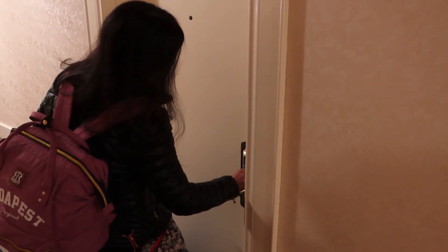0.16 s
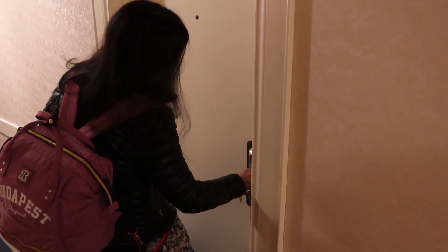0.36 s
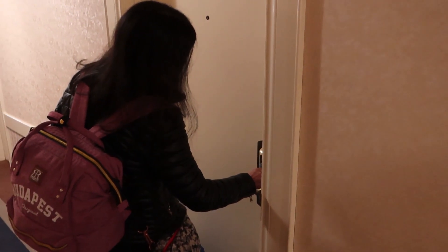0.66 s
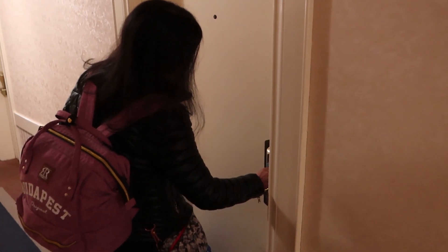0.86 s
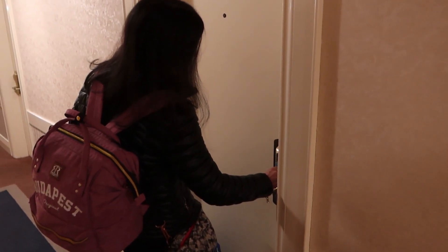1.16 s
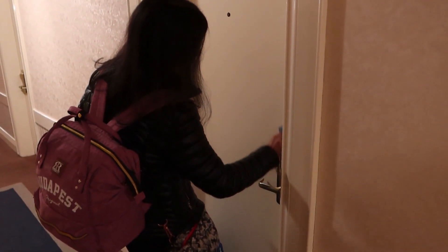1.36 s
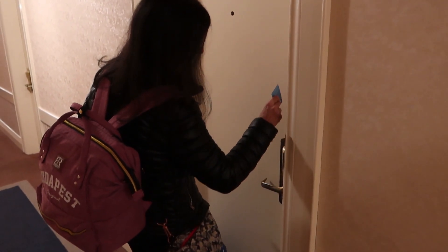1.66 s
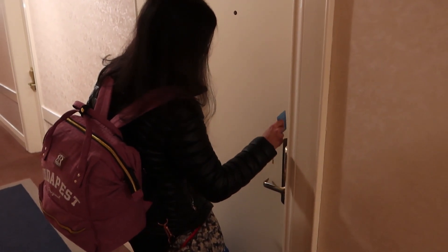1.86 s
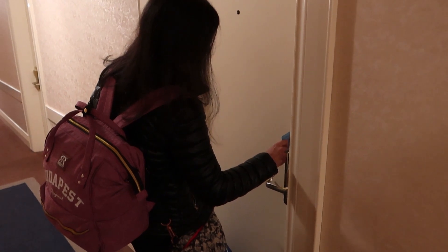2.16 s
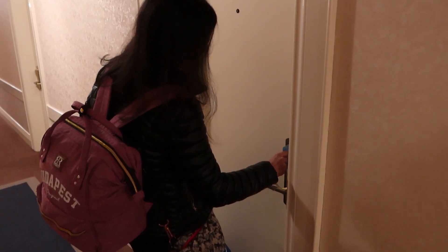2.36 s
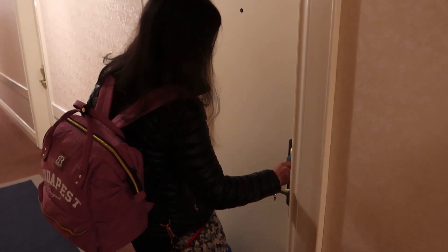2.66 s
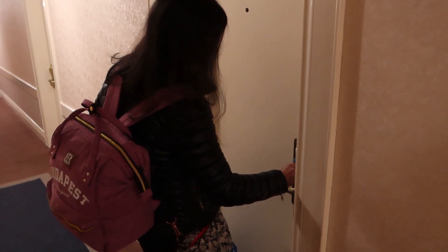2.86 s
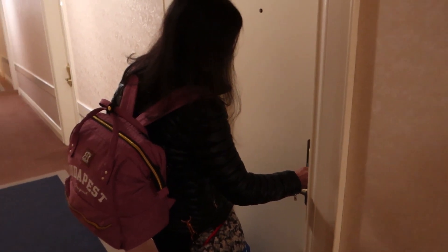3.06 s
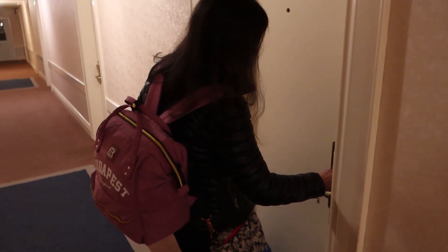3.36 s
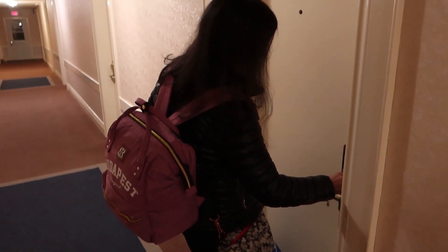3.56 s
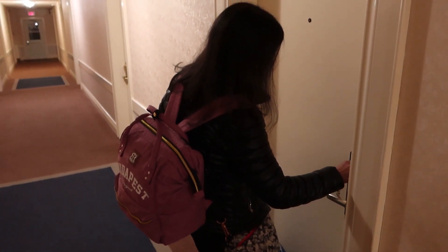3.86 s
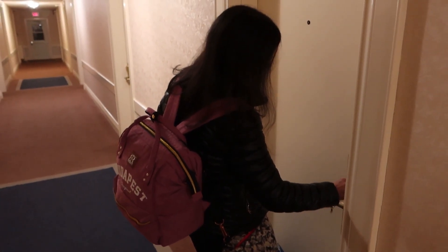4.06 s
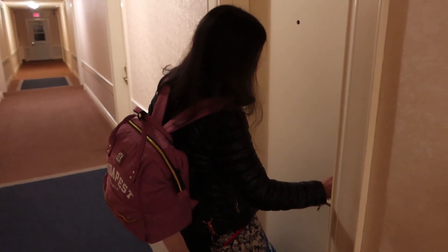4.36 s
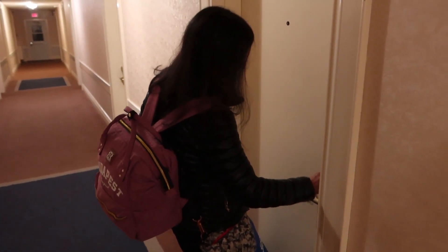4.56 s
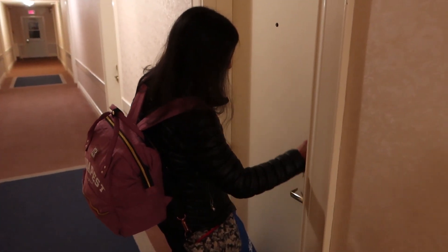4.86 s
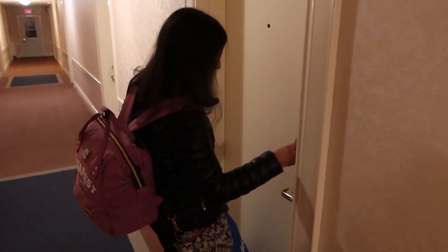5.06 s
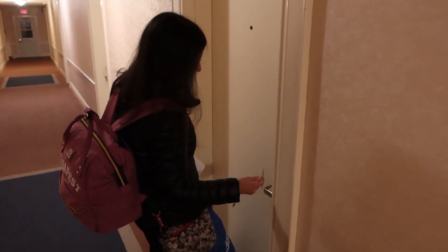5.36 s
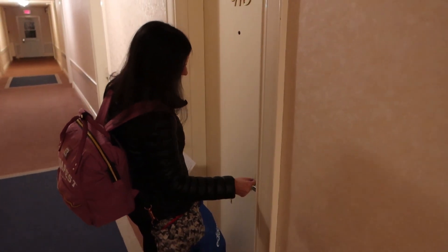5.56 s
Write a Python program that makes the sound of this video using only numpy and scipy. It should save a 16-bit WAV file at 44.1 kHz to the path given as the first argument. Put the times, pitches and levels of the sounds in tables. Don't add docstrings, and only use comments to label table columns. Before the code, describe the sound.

A metal door lever and lock are worked over and over in a carpeted corridor, with hard clunks, bright clicks and loose rattling.

```python
import sys
import numpy as np
from scipy import signal
from scipy.fft import rfft, irfft
from scipy.io import wavfile
from scipy.ndimage import uniform_filter1d

SR = 44100
rng = np.random.default_rng(int(sys.argv[2]) if len(sys.argv) > 2 else 0)


def dump_mix(stems):
    frames = np.atleast_2d(stems).T
    limited = np.clip(frames, -1, 1)
    pcm = np.round(limited * 32767).astype(np.int16)
    wavfile.write(sys.argv[1], SR, pcm)


def voltage_ratio(decibels):
    exponent = np.asarray(decibels, float) / 20
    return 10 ** exponent


N = 251634

# frequency in Hz, level in dB, time to fall 60 dB in seconds.
LEVER_LOW = [(2450, 1.5, 0.015), (2920, -2.5, 0.0086), (3100, 10, 0.014), (3363, 3.5, 0.03),
             (3970, 10, 0.021), (4440, 3, 0.023), (4970, -3.5, 0.091)]
LEVER_HIGH = [(5560, -8.5, 0.068), (5830, 0, 0.028), (6350, 5, 0.026), (6880, -5, 0.11),
              (7450, -0.5, 0.083), (7970, -16, 0.098), (8000, 1, 0.035), (8200, 3, 0.02),
              (8700, -17.5, 0.015), (9880, -34, 0.011), (12070, -41, 0.015), (13200, -35, .03)]
CASE = [(790, -6, 0.22), (800, -37, 0.02), (947, -3.5, 0.17), (1040, -2, 0.2), (1150, 0, 0.043),
        (1360, -16.5, 0.13), (1360, 12, 0.043), (1440, -13, 0.16), (1530, 9, 0.03), (1700, 6.5, 0.026),
        (2003, -4, 0.013), (2200, 1, 0.029)]
LEAF = [(150, -12, 0.1), (197.6, 5, 0.054), (304, -2, 0.15), (383.7, -3, 0.13), (462, -4.5, 0.093),
        (603.7, -0.5, 0.2), (693, -11, 0.024)]
# frequency in Hz, density in dB
# per Hz.
HISS = [(40, -26), (144, 9.5), (400, -36), (529, 3), (680, -7), (990, -4), (3300, -11), (16000, -15)]
# frequency in Hz, rms level in dB.
WHINE = [(1001, -68), (2998, -69.5), (4000, -63), (5001, -68.5), (6998, -72), (8000, -67.5), (9001, -72),
         (11999, -75)]
# time in seconds, gain in dB.
WHINE_SWELL = [(0, -7), (1.3, -3.5), (2.5, -4), (3.68, -5.5), (3.74, -3), (4.8, -14), (5.71, -5)]
# frequency in Hz, time to fall 60 dB in seconds.
CORRIDOR_DECAY = [(60, 0.81), (160, 1), (420, 0.69), (1100, 0.72), (1750, 0.7), (2900, 0.58), (7700, 0.52),
                  (14000, 0.25)]
# start in seconds, peak in dB, frequency in Hz, time to fall 60 dB in seconds.
THUMPS = [(1.064, -43.5, 204, 0.2), (1.498, -13, 265, 0.04), (1.512, -29.5, 74.3, 0.59),
          (4.842, -19, 270, 0.022), (4.854, -30, 332, 0.045), (4.946, -24.5, 343, 0.046),
          (4.964, -20, 285, 0.031), (4.978, -27, 92, 0.041), (5.27, -36, 520, 0.032),
          (0.1058, -26, 1300, .02), (0.1062, -29, 3100, .012), (0.2075, -38, 1000, .015),
          (0.3745, -38, 1100, .02), (1.4815, -9, 1410, .014), (2.971, -28, 5950, .045),
          (4.1075, -18, 1300, .03), (4.4245, -16, 1200, .03), (4.472, -26, 5900, .06),
          (4.6545, -27, 1040, .025), (2.584, -38, 1400, .08), (2.936, -36, 3500, .015),
          (3.706, -36, 650, .03), (4.7235, -15, 1330, .03), (4.726, -20, 1750, .015),
          (4.882, -28, 1120, .02), (4.968, -30, 1550, .06)]
# start in seconds, peak in dB, loudest ring in Hz,
# share below 5 kHz in dB, share of the loudest ring in dB.
FUMBLE_TICKS = [
    (0.073, -42, 2650, 0, 3),
    (0.087, -34, 2690, -7, 2),
    (0.106, -33.5, 2760, 4, 13.5),
    (0.211, -47, 2730, -3, 3),
    (0.233, -40.5, 8140, -1, -10),
]
BRUSH_TICKS = [
    (0.385, -39, 4440, -18, -5),
    (0.402, -36, 7900, -16, -9),
    (0.462, -41.5, 7840, -5, -8),
    (0.952, -28.5, 5000, -9.5, -3.5),
]
SNAP_TICKS = [
    (1.366, -36, 3300, 1, -8),
    (1.427, -31, 2910, 5, 0),
    (1.4515, -7.5, 7800, -8.5, -11),
    (1.4772, -14.5, 3100, 10.5, -25),
    (1.5434, -22.5, 4700, -23, -13),
    (1.632, -27.5, 7840, -16, -13),
    (1.747, -40, 3630, -10, -14),
    (1.785, -42.5, 3800, -2.5, -5),
    (2.0225, -37, 6350, 1, -3),
]
CARD_TICKS = [
    (2.584, -50, 2300, 4.5, 15),
    (2.7, -49.5, 2970, 6, -7),
    (2.88, -49, 3010, 1, -2),
    (2.913, -34.5, 2730, 2.5, -18),
    (2.934, -38, 3500, 4, 0),
    (2.9662, -28.5, 6000, -2, -2),
    (2.996, -41, 2620, 8, 14),
    (3.172, -25, 2780, -10, -7),
    (3.178, -24, 8800, 1, -4),
    (3.7055, -39.5, 3250, -2, 1),
]
PUMP_TICKS = [(4.014, -48, 3100, 10.5, 19.5), (4.1028, -15, 3960, -7, -14), (4.1072, -15, 8250, -4.5, -8),
              (4.152, -29, 3000, 7.5, -11), (4.165, -20.5, 3280, -14, -2.5), (4.356, -35, 3570, 1.5, 3),
              (4.4176, -13.5, 3150, -16, -2), (4.4223, -10, 3130, -6, -18), (4.4638, -20, 5600, -4, 3),
              (4.485, -25, 5960, -10, 0), (4.599, -34, 4900, -13, -4), (4.718, -18.5, 2700, -6, -5),
              (4.721, -22, 8000, 4, -2)]
RELEASE_TICKS = [(4.877, -37, 3380, 9.5, 2.5), (4.889, -28, 3660, -2.5, -7), (4.911, -9.5, 7730, -10, -5),
                 (4.937, -24, 5370, -3, -10), (5.004, -25.5, 3600, -10, -11), (5.044, -33.5, 3350, 5, 3),
                 (5.14, -41.3, 6540, -11, 0), (5.234, -43, 3700, 4.5, -8), (5.267, -42, 5840, -2, -3),
                 (5.449, -44.5, 3300, 2, -7), (5.615, -35, 7100, 1, -3)]
# start in seconds, peak in dB, loudest ring in Hz,
# share of the door leaf in dB, share of the loudest ring in dB.
FUMBLE_KNOCKS = [(0.074, -29, 1090, -25, -12), (0.09, -30, 1310, -25, 6.5), (0.106, -25, 1040, -20, -8),
                 (0.119, -30, 950, -7, 1), (0.161, -38, 1070, 4, 4), (0.2075, -33, 1440, -6, -12),
                 (0.223, -44, 1000, -12, 2), (0.305, -42, 1280, -10, -13), (0.37, -39.5, 1340, -4, -8),
                 (0.449, -51, 1440, 0, -1), (0.474, -42, 1290, -11, 4), (0.69, -59, 1090, 1.9, -4)]
SNAP_KNOCKS = [
    (1.3634, -38, 1440, -15.5, 7),
    (1.427, -20, 1410, -10.5, -10),
    (1.452, -16, 1320, -27, 7.5),
    (1.4593, -5, 1040, -19.5, -6),
    (1.4808, -4.5, 1380, -3, 4.5),
    (1.4855, -14, 1100, 5.5, -3),
    (1.591, -16, 1380, -17, -23),
    (2.024, -43, 1700, -9, 5),
]
CARD_KNOCKS = [(2.582, -29, 1450, -2, -13), (2.698, -36, 950, -12, -10), (2.879, -54, 1870, 7, -7),
               (2.912, -29, 1360, 0, -10), (2.934, -36, 950, 7, 10), (2.965, -20, 720, 1, 1),
               (2.9975, -18, 1380, -9, -16), (3.093, -31.5, 1150, -2, -1), (3.175, -28, 1790, 7, -5),
               (3.1822, -18, 1530, -15, -5), (3.296, -34, 1053, -13, -27), (3.7055, -28, 800, -9, -3)]
PUMP_KNOCKS = [(4.0156, -30, 1440, 1.5, -1), (4.038, -30, 1500, -2, -11), (4.1033, -26, 1290, -22, -9),
               (4.1065, -6.5, 1250, -17, -13), (4.151, -19, 1420, -17, -5.5), (4.17, -29, 1150, -20, -10),
               (4.268, -30.5, 1240, -5, -1), (4.359, -22.5, 1550, -3, -37), (4.42, -18, 1580, -21, 4),
               (4.423, -13, 1170, -20, 5), (4.462, -25, 960, -1, 7), (4.532, -20.5, 810, -7, -3),
               (4.636, -39, 1120, -10, 6), (4.654, -34, 1170, -5, 3), (4.718, -24, 1150, -22, -5.5),
               (4.7225, -9, 1150, -11.5, -13), (4.748, -30.5, 1170, 8.5, -11)]
RELEASE_KNOCKS = [
    (4.844, -26, 1340, -13, -13),
    (4.875, -25, 1130, -19, 0),
    (4.909, -17, 1420, -3, 3),
    (4.94, -26, 1130, 7, 5),
    (4.966, -27, 1530, -11, 1),
    (5.048, -32, 1280, -5, 2),
    (5.26, -56, 1170, -3, -4),
    (5.448, -46, 1440, 2, 2),
    (5.618, -34, 790, -10, 4.5),
]
# start in seconds, hold in seconds, level in dB, brightness in dB.
RUBS = [(0.0, 0.25, -49, -10.5), (1.375, .05, -54, -1), (1.437, 0.19, -35, -11.5),
        (1.943, 0.31, -51.5, -18), (2.779, 0.31, -58, -11), (3.173, 0.018, -43, -23),
        (3.742, 0.058, -53.5, 1), (3.858, 0.13, -50, -26), (4.054, 0.044, -51, 3.5), (4.17, 0.021, -38, -9),
        (4.418, 0.24, -42, -6.5), (4.813, 0.24, -47, -2), (5.19, 0.57, -53.5, -6), (5.5, 0.29, -51, -11)]
# time in seconds, level in dB.
SWAY = [(0, -42), (.14, -53), (.62, -51), (1.41, -48), (1.52, -40), (1.84, -52), (2.33, -42),
        (2.561, -48.5), (2.64, -34), (2.74, -43), (3.11, -43.5), (3.73, -46), (3.81, -38), (4.27, -37),
        (4.72, -49), (4.97, -38.5), (5.3, -44.5), (5.71, -39)]
# start in seconds, hold in seconds, thud in dB, boom in dB.
JOLTS = [(0, 0.0089, -61, -72), (1.127, 0.024, -52, -55), (1.53, 0.06, -31.5, -41), (1.786, 0.31, -61, -55),
         (2.19, 0.023, -44, -61), (2.634, 0.017, -48, -65), (3.1, 0.087, -57.5, -52),
         (4.07, 0.11, -47.5, -49.5), (4.854, 0.029, -39.5, -46), (4.953, 0.0085, -39, -42),
         (5.088, 0.016, -41.5, -66), (5.67, .05, -42.5, -61)]
# start in seconds, peak in dB, centre in Hz, chatter in seconds.
RATTLES = [(0.105, -29, 3200, .006), (0.2065, -40, 700, .008), (0.375, -42, 1100, .006),
           (1.3708, -46, 8470, .012), (1.4965, -15, 900, .008), (1.511, -20, 1100, .01),
           (1.526, -27, 800, .01), (1.553, -27, 1300, .01), (1.603, -25.5, 1000, 0.009),
           (1.639, -30, 1200, .01), (1.706, -31, 1560, .01), (1.78, -33, 900, .01), (2.968, -34, 605, .012),
           (4.0617, -47, 8160, .008), (4.099, -34, 1200, .004), (4.106, -12, 2200, .008),
           (4.111, -17, 8480, .006), (4.209, -42, 13200, .006), (4.252, -30, 1200, .008),
           (4.318, -34, 1180, .008), (4.334, -45, 8600, .006), (4.415, -25, 1010, .004),
           (4.422, -24, 2300, .008), (4.471, -20, 900, 0.0067), (4.471, -27, 5900, .008),
           (4.544, -31, 1500, 0.0074), (4.597, -34, 1500, .01), (4.6084, -40, 5200, 0.007),
           (4.6545, -31, 1040, 0.0037), (4.673, -45, 8010, .008), (4.712, -35, 900, .005),
           (4.7225, -17, 1890, .008), (4.8, -36, 904, .008), (4.851, -29, 1500, .008),
           (4.914, -22, 2300, .008), (4.97, -29, 2800, .01), (4.995, -31, 1100, .008)]
# start in seconds, hold in seconds, level in dB.
SPRING = [
    (1.375, .06, -58),
    (1.49, .05, -57),
    (4.03, .05, -64),
    (4.123, .02, -51),
    (4.19, .035, -56),
    (4.438, .06, -53),
    (4.73, .02, -58),
    (4.93, .1, -54),
]
# start in seconds, hold in seconds, level in dB, frequency in Hz.
DUCTS = [
    (.6, .7, -65, 860),
    (1.9, .45, -64, 1750),
    (5.5, .2, -60, 1650),
]

GRIP_LEVER, GRIP_CASE = 0.11, 0.3
RUB_RISE_DB_PER_S = 292


def curve(rows):
    s, db = np.transpose(rows)
    return np.interp(np.arange(N) / SR, s, db)


def at_hz(points, hz):
    table_hz, value = np.transpose(points)
    return np.interp(np.log(hz), np.log(table_hz), value)


def rms_one(x):
    return x / np.sqrt(np.mean(x ** 2) + 1e-20)


def energy_one(x):
    return x / np.sqrt(np.sum(x ** 2))


def band(x, low_hz, high_hz):
    return signal.sosfilt(signal.butter(2, [low_hz, high_hz], "band", fs=SR, output="sos"), x)


def shaped(x, spectrum):
    hz = np.maximum(np.fft.rfftfreq(len(x), 1 / SR), 1)
    return irfft(rfft(x) * voltage_ratio(at_hz(spectrum, hz)), len(x))


def swells(starts, holds, levels_db, rise_db_per_s, fall_db_per_s):
    t = np.arange(0, N + 64, 64)[:, None] / SR
    before = np.maximum(starts - t, 0)
    after = np.maximum(t - starts - holds, 0)
    db = levels_db - rise_db_per_s * before - fall_db_per_s * after
    return np.interp(np.arange(N) / SR, t[:, 0], np.sqrt(np.sum(voltage_ratio(db) ** 2, axis=1)))


def add(out, sound, s):
    i = round(s * SR)
    out[i:i + len(sound)] += sound[:N - i]


def ring(modes, spread_db, detune, grip=1, size=4500):
    hz, level_db, t60 = np.transpose(modes)[:, :, None]
    pitch_chance, level_chance = rng.standard_normal((2, 16, 1))[:, :len(modes)]
    t = np.arange(size) / SR
    waves = np.sin(2 * np.pi * hz * (1 + detune * pitch_chance) * t)
    decay = voltage_ratio(level_db + spread_db * level_chance - 60 * t / t60 / grip)
    return energy_one((decay * waves).sum(axis=0))


def chatter(length_s, per_s, size=3000):
    part = np.arange(size) / SR / np.clip(length_s, 0.002, 0.045)
    clicks = (rng.random(size) < per_s / SR) * rng.uniform(-1.21, 1, size)
    clicks[0] = 1.3
    softness = np.clip(60 * (length_s - 0.02), 0, 0.85)
    return energy_one(clicks * np.exp(-part ** 1.35) * (1 - softness * np.exp(-part / 0.2)))


def contacts(actions):
    rows = np.array([(*row, length_s) for table, length_s in actions for row in table])
    longest = 1.51 * np.diff(rows[:, 0])
    rows[:-1, -1] = np.minimum(rows[:-1, -1], longest)
    return rows


def ducts():
    out, air = np.zeros(N), rng.standard_normal(N)
    width, swell_db_per_s = 1.04, 60
    for s, hold, db, hz in DUCTS:
        gain = swells(np.array([s]), hold, db, swell_db_per_s, swell_db_per_s)
        out += gain * rms_one(band(air, hz / width, hz * width))
    return out


def electronics():
    t = np.arange(N) / SR
    hiss = voltage_ratio(-54.5) * rms_one(shaped(rng.standard_normal(N), HISS))
    tones = sum(voltage_ratio(db) * np.sqrt(2) * np.sin(2 * np.pi * (hz * t + rng.random())) for hz, db in WHINE)
    return hiss + tones * voltage_ratio(curve(WHINE_SWELL))


def handling():
    s, hold, thud_db, boom_db = np.transpose(JOLTS)
    rise_db_per_s, fall_db_per_s, rest_db = 202, 110.5, -57
    sway = voltage_ratio(curve(SWAY))
    thud = np.hypot(voltage_ratio(rest_db), swells(s, hold, thud_db, rise_db_per_s, fall_db_per_s))
    boom = np.hypot(voltage_ratio(rest_db), swells(s, hold, boom_db, rise_db_per_s, fall_db_per_s))
    out = np.zeros(N)
    for gain, low_hz, high_hz in ((sway, 8, 28), (thud, 35, 108), (boom, 140, 662)):
        noise = rng.standard_normal(N + SR)
        out += gain * rms_one(band(band(noise, low_hz, high_hz), low_hz, high_hz)[SR:])
    return out


def spring():
    s, hold, db = np.transpose(SPRING)
    grains = (rng.random(N) < 5000 / SR) * rng.standard_normal(N)
    return swells(s, hold, db, RUB_RISE_DB_PER_S, 151) * rms_one(band(grains, 8960, 15500))


def slide():
    out, (s, hold, db, bright_db) = np.zeros(N), np.transpose(RUBS)
    for body, level_db in ((CASE, db), (LEVER_LOW, db + 0.38 * bright_db), (LEVER_HIGH, db + bright_db)):
        catches = (rng.random(N) < 3500 / SR) * rng.standard_normal(N)
        catches = catches * voltage_ratio(2 * rng.standard_normal(N))
        gain = swells(s, hold, level_db - 3.5, RUB_RISE_DB_PER_S, 60)
        rubbed = signal.fftconvolve(catches, ring(body, 1, 0.01, GRIP_LEVER * 0.7))[:N]
        out += gain * rms_one(rubbed)
    return out


def rattles():
    out, touch = np.zeros(N), np.eye(1, 600)[0]
    width = 1.4
    for s, peak_db, hz, length_s in RATTLES:
        body = energy_one(band(touch, hz / width, hz * width))
        add(out, voltage_ratio(peak_db + 12.5) * signal.fftconvolve(chatter(length_s, 3000), body), s)
    return out


def thumps():
    out, t = np.zeros(N), np.arange(SR // 2) / SR
    for s, peak_db, hz, t60 in THUMPS:
        push = 1 - np.exp(-t * hz * 2)
        add(out, voltage_ratio(peak_db - 60 * t / t60) * np.sin(2 * np.pi * hz * t) * push, s)
    return out


def knocks():
    out, swell = np.zeros(N), 1 - np.exp(-np.arange(4500) / SR / 0.0027)
    actions = [(FUMBLE_KNOCKS, 0.019), (SNAP_KNOCKS, 0.02), (CARD_KNOCKS, 0.022), (PUMP_KNOCKS, 0.02),
               (RELEASE_KNOCKS, 0.019)]
    for s, peak_db, hz, leaf_db, ring_db, length_s in contacts(actions):
        case = ring(CASE, 2, 0.025, GRIP_CASE)
        case += voltage_ratio(ring_db) * ring([(hz, 0, 0.012)], 0, 0)
        leaf = swell * ring(LEAF, 2, 0.03, 0.6)
        body = band(case, 874, 2200) + voltage_ratio(leaf_db + 1) * leaf
        add(out, voltage_ratio(peak_db + 16.5) * signal.fftconvolve(chatter(length_s, 3500), body), s)
    return out


def ticks():
    out, touch = np.zeros(N), np.eye(1, 60)[0]
    crack_top_hz = 9440
    actions = [(FUMBLE_TICKS, 0.015), (BRUSH_TICKS, 0.032), (SNAP_TICKS, 0.015), (CARD_TICKS, 0.015),
               (PUMP_TICKS, 0.016), (RELEASE_TICKS, 0.016)]
    for s, peak_db, hz, low_db, ring_db, length_s in contacts(actions):
        bright = ring(LEVER_HIGH, 3, 0.02, GRIP_LEVER)
        dull = ring(LEVER_LOW, 3, 0.03, GRIP_LEVER)
        bright[:60] += voltage_ratio(-6) * band(band(touch, 3000, crack_top_hz), 2000, crack_top_hz)
        air_db = -2.5 + 0.24 * (peak_db + 11.5)
        bright[:60] += voltage_ratio(air_db) * band(touch, crack_top_hz, 22000)
        dull[:60] += voltage_ratio(-9) * band(touch, 2080, 5900)
        loudest = ring([(hz, 0, 0.008)], 0, 0)
        body = bright + voltage_ratio(low_db + 3) * dull + voltage_ratio(ring_db) * loudest
        add(out, voltage_ratio(peak_db + 13.5) * signal.fftconvolve(chatter(length_s, 7000), body), s)
    return out


def corridor(x):
    doorway_t60_s, doorway_db, tail_db = 0.0482, -12.5, -12.5
    t = np.arange(SR) / SR
    near = rng.standard_normal(SR) * voltage_ratio(-60 * t / doorway_t60_s) * (t > 0.002)
    edges = 40 * 2 ** np.arange(0, 9, 0.5)
    white = rng.standard_normal((2, SR))
    far = np.zeros(SR)
    for k, (low, high) in enumerate(zip(edges, edges[1:])):
        t60 = at_hz(CORRIDOR_DECAY, np.sqrt(low * high))
        far += band(white[k % 2], low, high) * voltage_ratio(-60 * t / t60)
    clumps = voltage_ratio(1.2 * rms_one(uniform_filter1d(white[1], size=300)))
    far = far * (1 - np.exp(-t / 0.0028)) * clumps
    echo = (voltage_ratio(doorway_db) * rms_one(near) + voltage_ratio(tail_db) * rms_one(far)) / np.sqrt(SR)
    return x + signal.fftconvolve(x, echo)[:N]


def scene():
    background = ducts() + electronics() + handling()
    sliding = spring() + slide()
    loose = corridor(rattles())
    door = corridor(thumps() + knocks() + ticks())
    return (background + sliding + loose + door)[None]


def top_cut(x):
    return signal.sosfilt(signal.butter(12, 16650, fs=SR, output="sos"), x)


def record(dry):
    rounded = 1.554 * np.tanh(dry / 1.636)
    low_pass = signal.ellip(7, 1, 32, 15800, fs=SR, output="sos")
    finished = np.clip(signal.sosfilt(low_pass, rounded), -1, 1)
    return top_cut(finished)


dry = scene()
out = record(dry)
dump_mix(out)
```